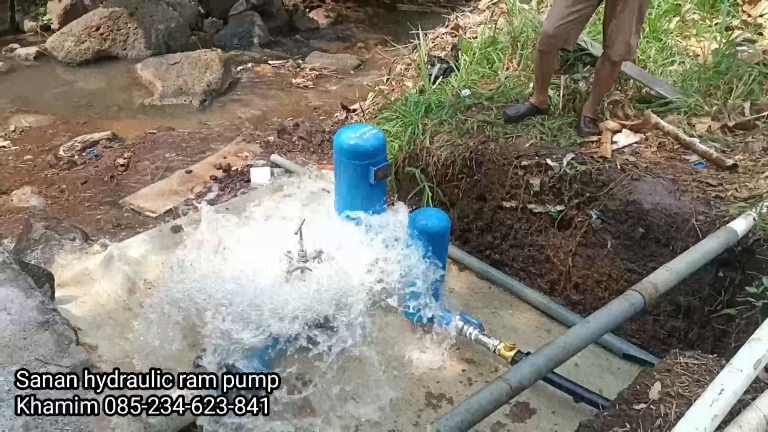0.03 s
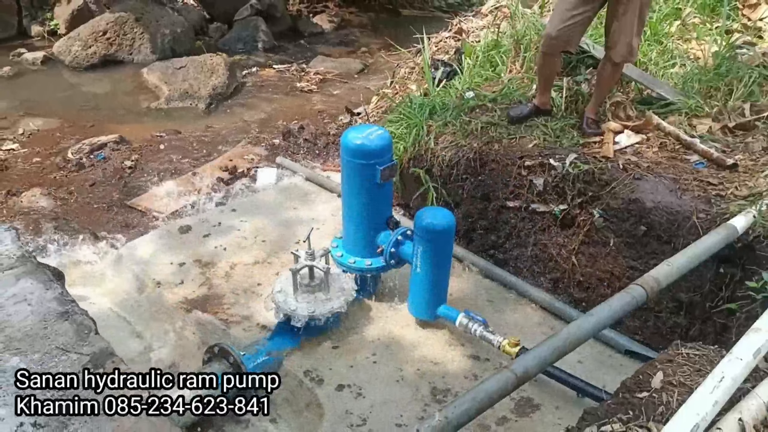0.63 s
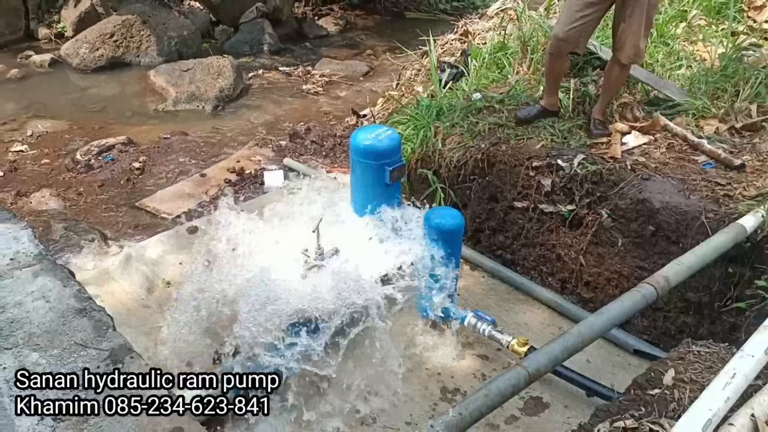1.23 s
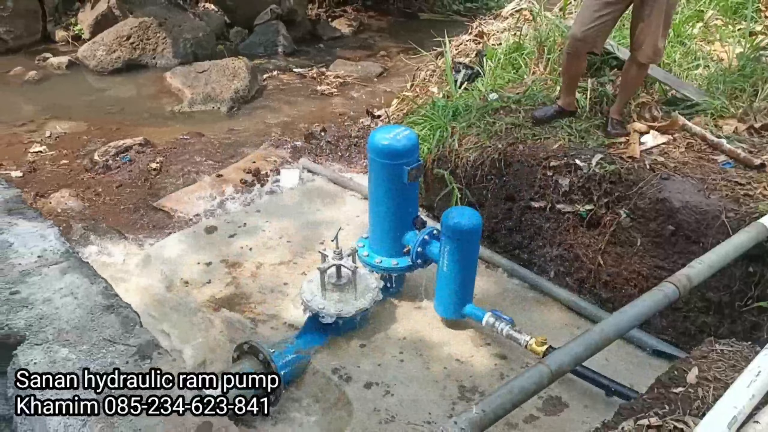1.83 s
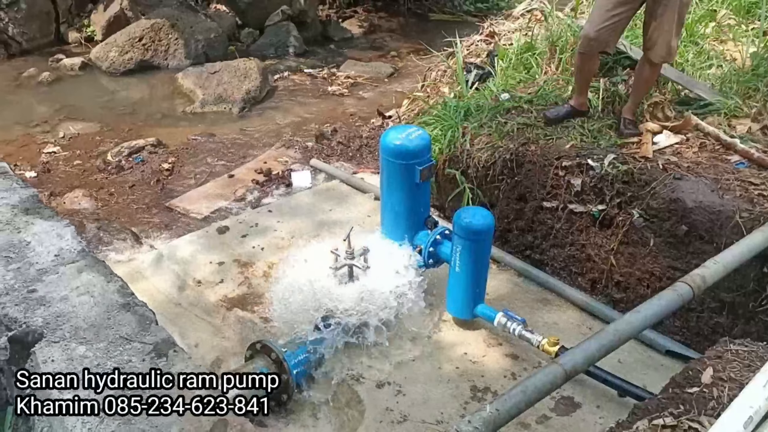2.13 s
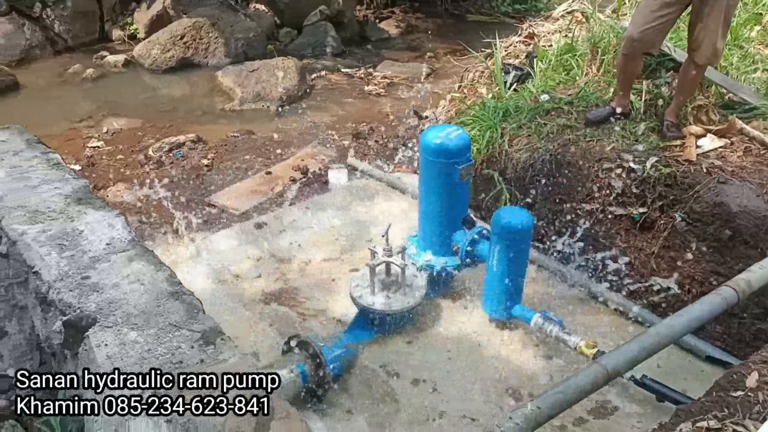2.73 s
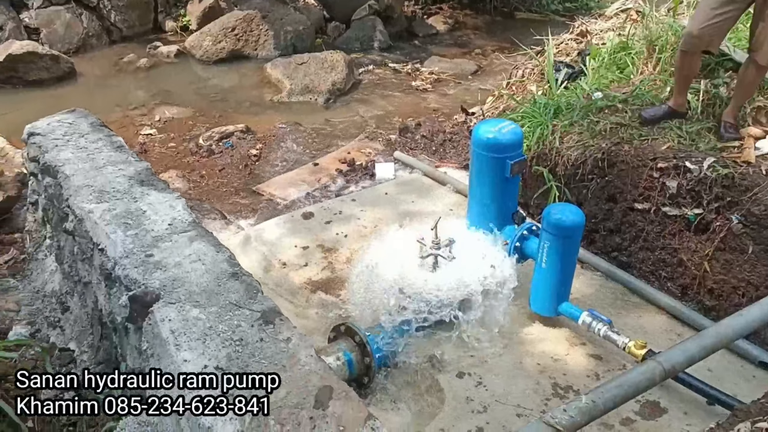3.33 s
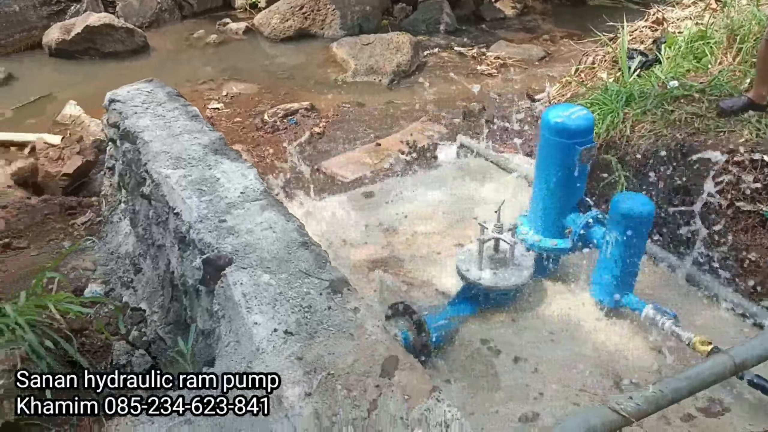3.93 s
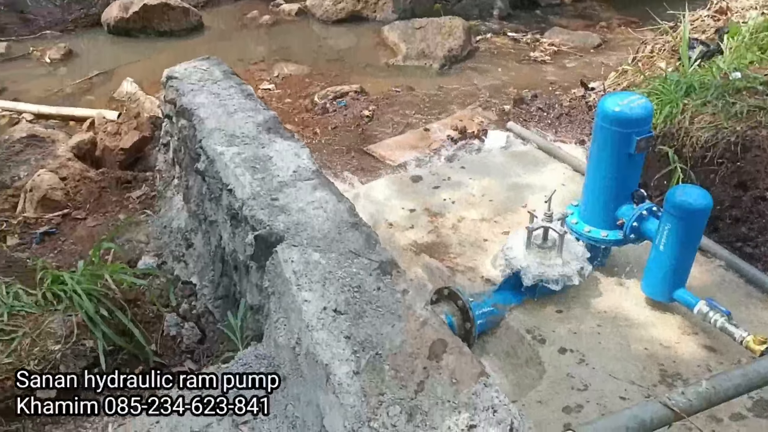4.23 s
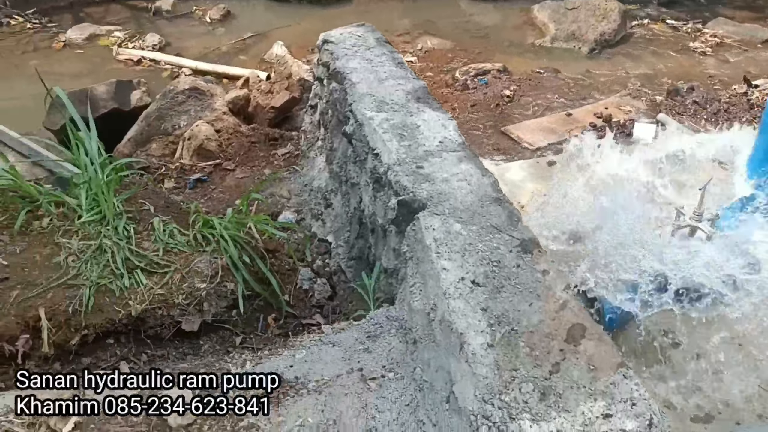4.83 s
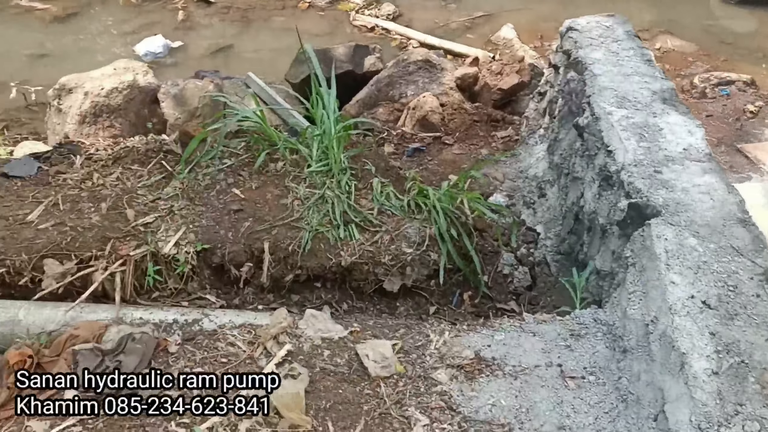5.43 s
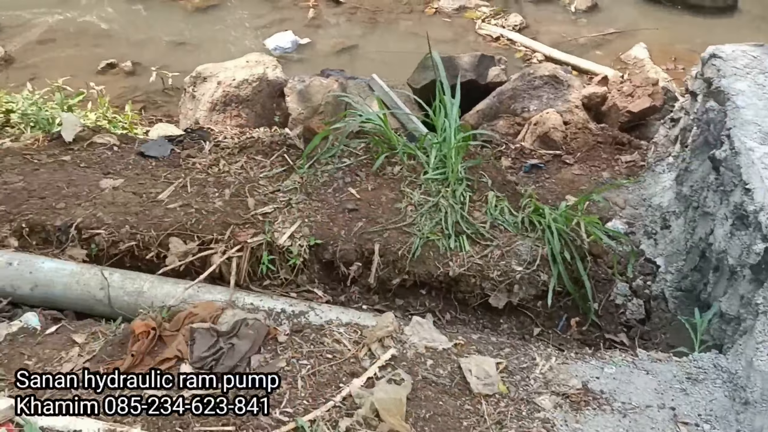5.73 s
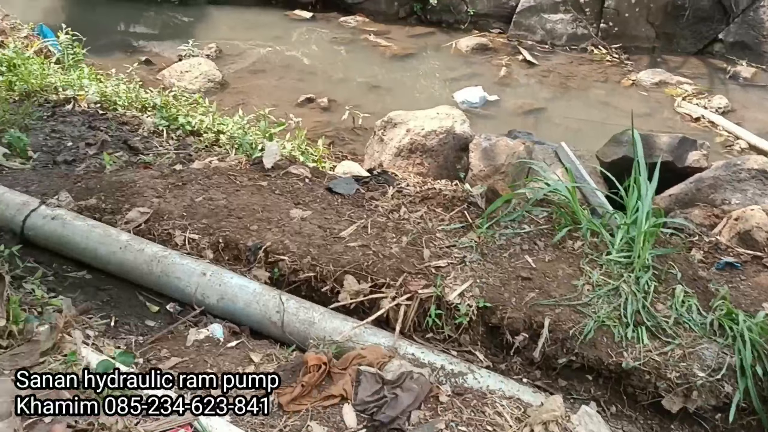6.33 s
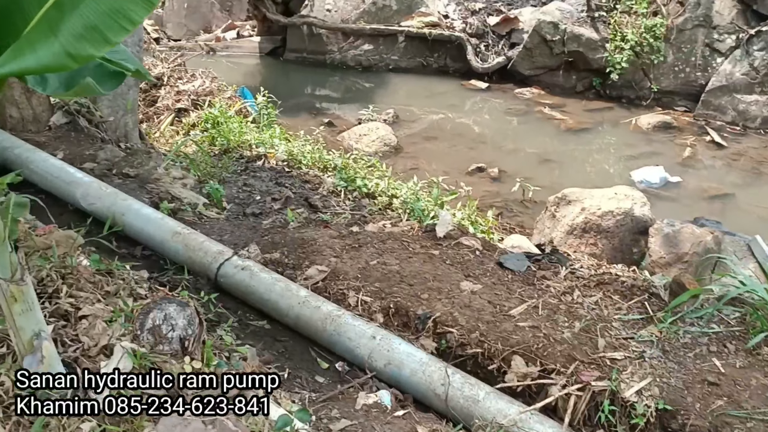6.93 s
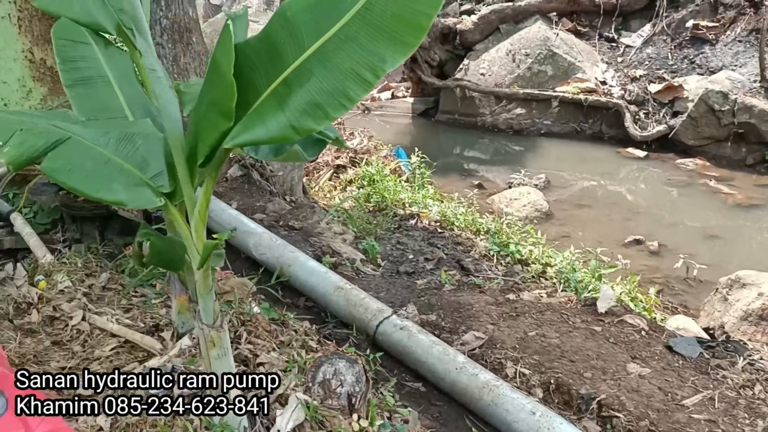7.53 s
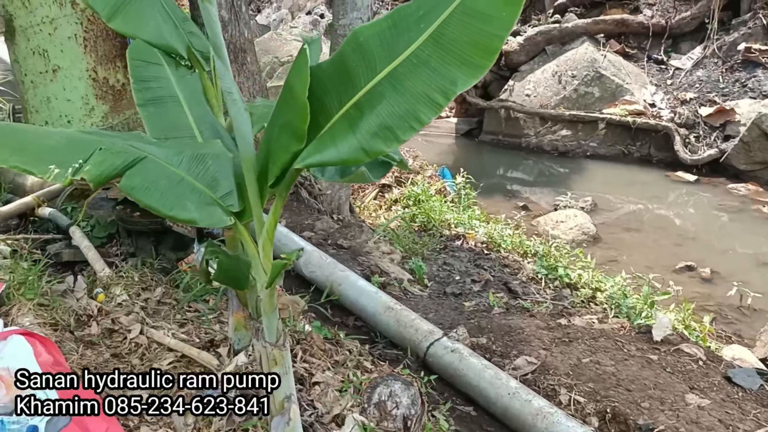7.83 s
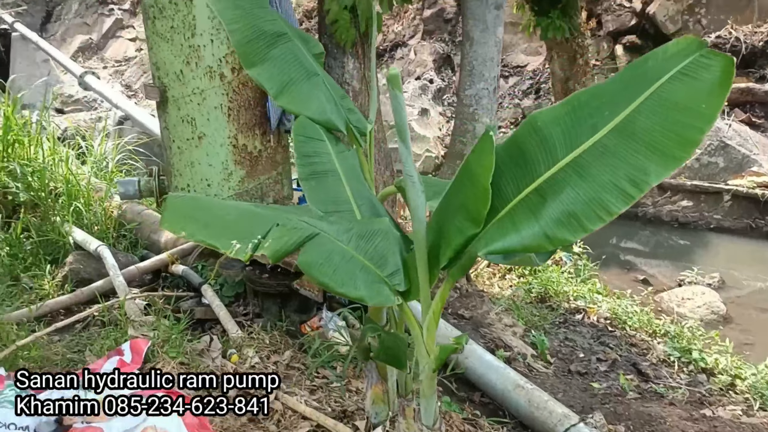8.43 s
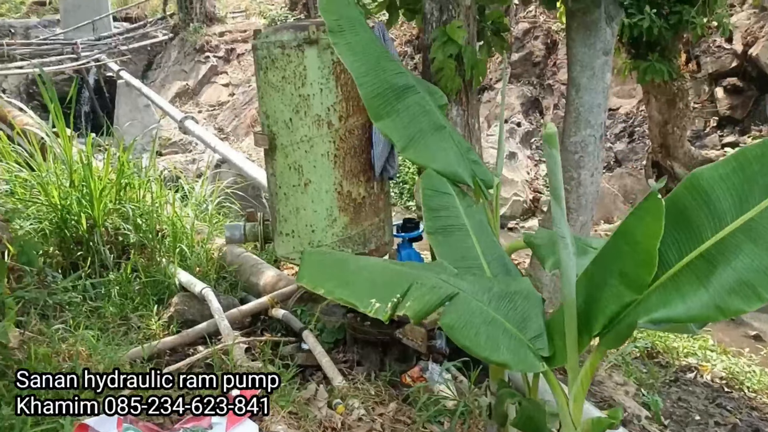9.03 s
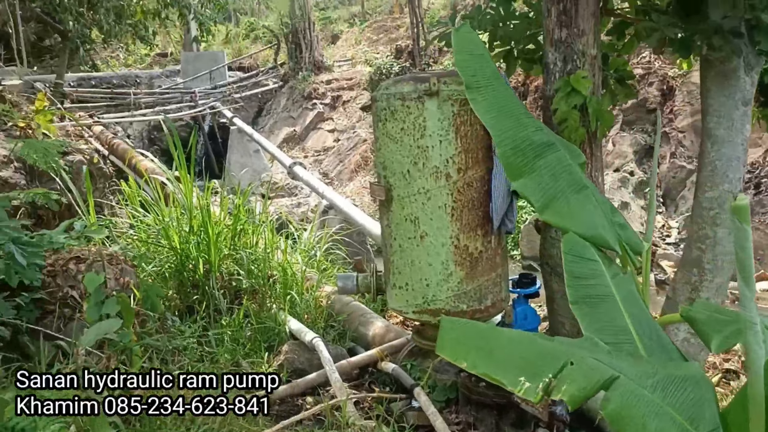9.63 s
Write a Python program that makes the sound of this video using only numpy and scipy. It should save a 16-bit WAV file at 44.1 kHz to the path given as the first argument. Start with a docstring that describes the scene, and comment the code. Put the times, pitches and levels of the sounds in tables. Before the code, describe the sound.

Outdoors beside a softly rushing stream, a hydraulic ram pump slams about every 1.2 seconds. Each time, water gushes faster and faster, the pipe thumps, the steel valve clacks and rings, and spray rains onto concrete. Halfway through, the microphone turns and moves away: the pump shifts from left to right and the spray becomes fainter and duller, while the clacks stay loud but lose their ring.

```python
"""A hydraulic ram pump slams about every 1.2 s on a concrete slab beside a softly rushing stream.
Water gushes ever faster from the waste valve until it shuts: the drive pipe thumps, the steel clacks
and rings, thrown water rains back, and the valve drops open again. Something dry snaps once nearby.
The listener turns and steps away: the pump moves from left to right and the spray grows fainter and
duller; the clack stays loud but loses its brightness and ring."""
import sys
import numpy as np
from scipy import signal
from scipy.fft import rfft, irfft, next_fast_len
from scipy.io import wavfile
from scipy.ndimage import map_coordinates

SR = 44100
rng = np.random.default_rng(int(sys.argv[2]) if len(sys.argv) > 2 else 0)


def materialize(psi):
    """Save the field psi as 16-bit PCM at rate SR to the path in sys.argv[1].

    A 1-D psi becomes a single channel; in a 2-D psi each row is a channel.
    """
    bounded = np.clip(np.atleast_2d(psi).T, -1, 1)
    quanta = np.round(bounded * 32767).astype(np.int16)
    wavfile.write(sys.argv[1], SR, quanta)


N = 426447
TIME = np.arange(N) / SR


def from_db(db):
    """Decibels to gain."""
    return 10 ** (np.asarray(db) / 20)


def over_bins(points):
    """A curve over log frequency, read at every Fourier bin."""
    hz, value = np.transpose(points)
    return np.interp(np.log(np.fft.rfftfreq(next_fast_len(N), 1 / SR) + 1), np.log(hz), value)


def colour(sound, gain):
    """Equalise a sound with one gain per Fourier bin."""
    return irfft(rfft(sound, next_fast_len(N)) * gain, next_fast_len(N))[..., :N]


def drift(per_s):
    """A random wobble with a spread of about 1."""
    knots = rng.standard_normal(4000)
    return 1.2 * np.interp(TIME * per_s, np.arange(len(knots)), knots)


def envelope(age, attack_s, hold_s, fall_db_per_s):
    """A straight attack, full level until the age hold_s, then a steady fall in decibels."""
    return np.clip(age / attack_s, 0, 1) * from_db(-fall_db_per_s * np.maximum(age - hold_s, 0))


def ring(drive, hz, t60):
    """One damped resonance: a unit click sets a sine of height 1 ringing."""
    radius, angle = from_db(-60 / (t60 * SR)), 2 * np.pi * hz / SR
    return signal.lfilter([0, np.sin(angle)], [1, -2 * radius * np.cos(angle), radius**2], drive + 1e-18)


def clicks(times, sizes):
    """Single clicks at the given times."""
    out = np.zeros(N)
    out[np.clip(np.round(np.asarray(times) * SR).astype(int), 0, N - 1)] = sizes
    return out


# Stereo width of the patter. Each row: frequency in Hz, likeness of left and right from 0 to 1.
STEREO_LIKENESS = [(25, 0.22), (70, 1), (200, 0.89), (500, 1), (1000, 0.8), (2500, 0.071), (8000, 0.05),
                   (15000, 0.089)]

def patter(spectrum, grain_db):
    """Countless tiny impacts, partly shared by both sides; more grain_db makes them grittier."""
    grains = rng.standard_normal((3, N)) * from_db(grain_db * np.clip(rng.standard_normal(N), -3, 3.5))
    grains /= grains.std()
    alike = np.clip(over_bins(STEREO_LIKENESS), 0, 1)
    gain = from_db(over_bins(spectrum)) * np.sqrt(SR / 2)
    return colour(grains[0], gain * np.sqrt(alike)) + colour(grains[1:], gain * np.sqrt(1 - alike))


def drops(per_s, low_hz, high_hz, cycles, spread_db, rise=0.027):
    """Drops and bubbles, each ringing at its own slightly rising pitch in its own place; rms 1."""
    when, pitch, size, *sides = rng.random((15000, 5))[:int(per_s * N / SR)].T[..., None]
    steps = np.arange(int(cycles / low_hz * SR))
    turns = (low_hz * (high_hz / low_hz) ** pitch * steps / SR).astype(np.float32)
    decay = np.exp(-float(np.log(1000)) * turns / cycles)
    rings = decay * np.sin(2 * np.pi * turns * (1 + rise * turns / cycles))
    rings = rings * from_db(spread_db * np.minimum(-np.log(size), 4))
    at = ((when * N).astype(int) + steps).ravel()
    out = np.array([np.bincount(at, (rings * (2 * side - 1)).ravel(), N)[:N] for side in sides])
    return out / out.std()


# The rush of the stream. Each row: frequency in Hz, level in dB per Hz.
STREAM_SPECTRUM = [(20, -78), (60, -83.5), (130, -84), (300, -85), (550, -81.5), (950, -83), (1600, -86.5),
                   (3200, -79), (4100, -79), (4900, -99), (6800, -83), (9700, -99), (15500, -99)]

def stream(gurgle_db=-56):
    """The background bed: running water with a soft rush and small gurgles."""
    rush = patter(STREAM_SPECTRUM, grain_db=5)
    return rush + from_db(gurgle_db) * drops(200, 476, 1610, cycles=16, spread_db=0)


def snap(at_s=4.323, snap_db=-25, decay_s=0.004):
    """Something dry cracks once on the ground nearby."""
    since = np.maximum(TIME - at_s, 0)
    band = signal.butter(2, [2100, 4200], "band", fs=SR, output="sos")
    crack = signal.sosfilt(band, rng.standard_normal((2, N)))
    return from_db(snap_db) * crack / crack.std() * (since > 0) * np.exp(-np.minimum(since / decay_s, 50))


# Stray plops of water. Each row: start in seconds, peak level in dB, pitch in Hz, t60 in seconds.
STRAY_PLOPS = [(1.855, -36, 570, .06), (2.001, -40, 275, 0.088), (2.243, -24, 1310, 0.091),
               (3.176, -38.5, 272, 0.067), (5.019, -20, 1500, 0.017), (6.712, -36.5, 574, .045)]

def knocks_and_plops(contact_s=0.0019, gear_lag_s=0.147, gear_db=-29.5, gear_hz=295, gear_t60=0.029,
                     plop_hz=565, plop_t60=0.06):
    """The valve gear knocks, the disc plops open, stray water lands: each a rough push on one resonance."""
    out, t = np.zeros(N + SR), TIME[:SR // 4]
    gear = [(s + gear_lag_s, gear_db, gear_hz, gear_t60) for s, *_ in STROKES]
    reopenings = [(s + reopen_s, db, plop_hz, plop_t60) for s, _, _, _, reopen_s, db, _ in STROKES]
    for start_s, db, hz, t60 in gear + reopenings + STRAY_PLOPS:
        push = np.exp(-t / contact_s) * (1 + rng.standard_normal(len(t)))
        push[0] += 8   # a hard leading edge
        push -= signal.lfilter([.02], [1, -.98], push)   # low cut
        knock, at = ring(push, hz, t60), int(start_s * SR)
        out[at:at + len(t)] += from_db(db) * knock / np.abs(knock).max()
    return out[:N]


# The colours of the water and the hiss. Each row: frequency in Hz, relative level in dB per Hz.
SPRAY_SPECTRUM = [(30, -93), (70, -56.5), (140, -54), (250, -67), (420, -67), (650, -67), (1400, -66),
                  (2300, -64.5), (3600, -65.5), (4900, -68), (7000, -72.5), (9500, -83), (15500, -108)]   # thrown by the closing valve
SPLASH_SPECTRUM = [(30, -99), (90, -71.5), (180, -83), (280, -77.5), (450, -88), (800, -76.5), (1500, -77),
                   (2500, -68), (3700, -68), (4900, -74.5), (6800, -71.5), (9700, -83.5), (12500, -85.5),
                   (15500, -89)]   # raining back down
GUSH_SPECTRUM = [(30, -93.5), (300, -89.5), (550, -100), (900, -89.5), (2000, -73), (3300, -73),
                 (4200, -73.5), (4900, -78), (6800, -77), (9700, -89), (12500, -89.5), (15500, -95)]   # pouring from the valve
HISS_SPECTRUM = [(300, -115), (1700, -93), (2400, -71), (3100, -75.5), (3700, -87), (4600, -101),
                 (7000, -96.5), (10000, -105)]   # a narrow hiss near 3 kHz that swells before each slam
SLAP_SPECTRUM = [(100, -105), (450, -107), (700, -82), (930, -76), (1300, -74), (1700, -70.5), (2400, -105),
                 (8000, -115)]   # lumps of water hitting the slab

def waste_water(stroke, age, hiss_db, run_up_s=0.82, flight_s=0.023, flutter_db=1.13):
    """Spray bursts from the closing valve and falls on the slab; once it reopens, the gush builds."""
    reopen_s, _, gurgle_db = np.array(STROKES)[stroke, 4:].T
    speed = np.tanh(np.maximum(age - reopen_s, 0) / run_up_s)   # of the water column, 1 at its fastest
    welling = from_db(4) * speed ** 2.09
    squirt = from_db(21 - 1500 * age)   # squeezed out as the valve shuts
    falling = from_db(-2.44) * envelope(age - flight_s, attack_s=0.044, hold_s=0.44, fall_db_per_s=36)
    spray = from_db(4 - 71.5 * age + flutter_db * drift(120)) * patter(SPRAY_SPECTRUM, grain_db=0.5)
    droplets = from_db(-45) * drops(900, 1660, 9400, cycles=39, spread_db=5)
    droplets += from_db(-57) * drops(400, 4600, 14000, cycles=2.7, spread_db=-4)   # ticks on concrete
    splash = falling * from_db(flutter_db * drift(40)) * (patter(SPLASH_SPECTRUM, grain_db=4) + droplets)
    outflow = (welling + squirt) * patter(GUSH_SPECTRUM, grain_db=3.5)
    hiss = from_db(hiss_db) * speed ** 3.5 * patter(HISS_SPECTRUM, grain_db=5.5)
    rush = from_db(flutter_db * drift(25)) * (outflow + hiss)
    bubbles = from_db(-48) * drops(380, 755, 3160, cycles=50, spread_db=2.8)
    slaps = from_db(3 * drift(35) - 1.5) * patter(SLAP_SPECTRUM, grain_db=4.5)
    flow = np.hypot(falling, welling)   # all moving water gurgles
    return spray + splash + rush + (bubbles + slaps) * flow * from_db(gurgle_db)


# The modes of the drive pipe and air vessel. Each entry: pitch in Hz.
PIPE_MODE_HZ = [66, 76, 89, 108, 127, 141, 172, 197, 283, 296, 335, 360, 489, 573, 597, 711, 796, 964, 1065]
# How those modes ring. Each row: relative level in dB, t60 in seconds.
PIPE_RINGS = [(-28, 0.26), (-27.5, 0.51), (-41.5, 2.08), (-33.5, 0.82), (-29.5, 0.23), (-37, 0.55),
              (-38.5, 1.7), (-30, 0.41), (-35, 0.2), (-37, 0.62), (-32, 0.16), (-48, 3.15), (-42, 0.52),
              (-34, 0.29), (-44, 0.16), (-33.5, 0.29), (-39, 0.14), (-49, 0.19), (-36, 0.32)]
# The burst of noise around each thump. Each row: frequency in Hz, level at its peak in dB per Hz.
SURGE_SPECTRUM = [(30, -79), (90, -54), (200, -44.5), (350, -59.5), (550, -54.5), (1000, -48.5),
                  (1600, -63.5), (2500, -64), (5000, -73), (16000, -79)]

def water_hammer(thump_db=-18, width_s=0.0027, surge_lead_s=0.006, surge_decay_s=0.0059, low_cut_hz=56,
                 rebound_lag_s=0.01204, rebound_db=-39):
    """The stopping water column jolts the pipe just before the steel meets; the pressure rebounds later."""
    slam_s, _, _, lead_s, reopen_s = np.array(STROKES).T[:5]
    jolt, surge = np.zeros(N), np.zeros(N)
    for at in slam_s - lead_s:
        squared = ((TIME - at) / width_s) ** 2
        jolt += (1 - squared) * np.exp(-np.minimum(squared / 2, 50))   # a shove radiates its acceleration
        surge += (TIME > at - surge_lead_s) * np.exp(-np.minimum(np.abs(TIME - at) / surge_decay_s, 50))
    blows = clicks(slam_s - lead_s, 0.88)
    body = sum((-1) ** k * from_db(db) * ring(blows, hz, t60)
               for k, (hz, (db, t60)) in enumerate(zip(PIPE_MODE_HZ, PIPE_RINGS)))
    # a thin pipe radiates no deep bass
    body = signal.sosfilt(signal.butter(4, low_cut_hz, "high", fs=SR, output="sos"), body)
    kicks = clicks((slam_s + reopen_s + rebound_lag_s)[:-1], from_db(rebound_db))
    rebound = ring(kicks, hz=186, t60=0.4)
    return from_db(thump_db) * jolt + body + rebound + surge * patter(SURGE_SPECTRUM, grain_db=4)


# The modes of the steel valve. Each entry: pitch in Hz.
VALVE_MODE_HZ = [2114, 2230, 3498, 3560, 3720, 5221, 6298, 7245, 9570, 12205]
# How those modes ring. Each row: relative level in dB, t60 in seconds.
VALVE_RINGS = [(-39, 0.42), (-35.5, 0.035), (-33.5, 0.36), (-33, 0.052), (-22, 0.019), (-35, 0.14),
               (-56, .25), (-34.5, 0.15), (-45, .07), (-31, 0.024)]
# The clack of disc on seat. Each row: frequency in Hz, relative level in dB per Hz.
CLACK_SPECTRUM = [(40, -61), (200, -71), (520, -56), (750, -55), (1000, -53), (1600, -58.5), (2500, -60),
                  (4000, -53), (5000, -57), (7000, -53.5), (9000, -63), (11000, -66.5), (15500, -66)]
# The pump's strokes. Each row: slam time in seconds, clack trim in dB, ring trim in dB, lead of the
# thump in seconds, wait until reopening in seconds, reopening plop in dB, gurgle trim in dB.
STROKES = [(.142, -3, 1.5, .0086, 0.31, -25.5, 1.5), (1.330, 1, -1, 0.0068, 0.31, -30.5, 1.5),
           (2.509, -1, 1, 0.0059, 0.3, -30, 3.5), (3.6965, -2.5, 0.5, 0.0074, 0.29, -35, 4.5),
           (4.876, -2, 0, 0.0058, .32, -35, 1.5), (6.061, -0.5, 1, 0.00596, 0.34, -37, 1),
           (7.247, .5, -1.5, 0.00485, .33, -39, -2), (8.432, 5, -6, 0.00423, .332, -36.5, -1.5),
           (9.614, 6.5, -11, 0.0015, .33, -36, -1)]

def valve_slam(stroke, age, chatter_db=-24, sag_db_per_s=36, flutter_db=-0.5, cushion_hz=6000):
    """The disc crashes on its seat, then chatters while the pressure lasts and keeps the steel ringing."""
    slam_s, clack_db, ring_db = np.array(STROKES).T[:3]
    crack = from_db(2) * envelope(age, attack_s=0.0014, hold_s=0.0014, fall_db_per_s=806)
    rattle = from_db(-7.5) * envelope(age, attack_s=0.0014, hold_s=0.0014, fall_db_per_s=153)
    impact = np.hypot(crack, rattle) * from_db(clack_db[stroke] + flutter_db * drift(500))
    crash = impact * patter(CLACK_SPECTRUM, grain_db=2.5)
    chatter = envelope(age, attack_s=0.007, hold_s=0.1, fall_db_per_s=380)
    chatter *= from_db(chatter_db - sag_db_per_s * age + flutter_db * drift(150))
    first_blow = clicks(slam_s, 0.14)
    for hz, (db, t60) in zip(VALVE_MODE_HZ, VALVE_RINGS):
        cushion = 1 / np.hypot(1, hz / cushion_hz)   # water softens the later touches
        touches = first_blow + cushion * chatter * rng.standard_normal((2, N))
        crash += ring(touches * from_db(ring_db[stroke] + db), hz, t60)
    return crash


def stroke_clock(lead_in_s=1.3):
    """Which slam came last, and how many seconds ago; the pump is already mid-stroke at the start."""
    slam_s = np.array(STROKES)[:, 0]
    last = np.searchsorted(slam_s, TIME, side="right") - 1
    age = np.where(last < 0, TIME - slam_s[0] + lead_in_s, TIME - slam_s[last])
    return np.maximum(last, 0), age


def listener_walk(mid_turn_s=5.35, turn_ease_s=0.52, leave_s=4.81, start_m=3.8, m_per_s=0.38):
    """How far the listener has turned (0-1), and how often the distance to the pump has doubled."""
    turned = (1 + np.tanh((TIME - mid_turn_s) / turn_ease_s)) / 2
    return turned, np.log2(1 + m_per_s * np.maximum(TIME - leave_s, 0) / start_m)


def scene(treble_hz=5200, pump_loss_db=3.5, treble_loss_db=14, stream_loss_db=4.5):
    """The mix, with losses per doubling of distance; the last clacks' trims keep them loud."""
    stroke, age = stroke_clock()
    turned, doublings = listener_walk()
    hiss_db = np.interp(turned, [0, 1], [-3, 10])   # louder once the listener turns
    left_lag_ms = np.interp(turned, [0, 1], [-0.313, 0.283])
    pump = valve_slam(stroke, age) + waste_water(stroke, age, hiss_db)
    highs = signal.sosfilt(signal.butter(1, treble_hz, "high", fs=SR, output="sos"), pump)
    pump += (from_db(2.5 - treble_loss_db * doublings) - 1) * highs   # a sinking high shelf
    pump *= from_db(0.01 - pump_loss_db * doublings)
    left, right = pump + water_hammer() + knocks_and_plops() + snap()
    left = map_coordinates(left, [(TIME - left_lag_ms / 1000) * SR], order=3)
    return np.array([left, right]) + from_db(-stream_loss_db * doublings) * stream()


# The tone of the two sides. Each row: frequency in Hz, left minus right in dB.
STEREO_BALANCE = [(100, 0), (450, 0), (750, -1.5), (1200, -2.5), (2000, -4), (3300, -5.5), (5500, -3),
                  (7500, -1), (9000, 1.5), (12000, -5), (15000, -8)]

def record(dry, ceiling=0.63, cutoff_hz=15400):
    """The master: each side gets its own colour, the highest peaks are rounded and the top is cut."""
    heard = colour(dry, from_db(np.outer([1, -1], over_bins(STEREO_BALANCE)) / 2))
    heard = heard / (1 + (heard / ceiling) ** 4) ** .25
    return signal.sosfilt(signal.ellip(10, .2, 80, cutoff_hz, fs=SR, output="sos"), heard)


dry = scene()
out = record(dry)
materialize(out)
```